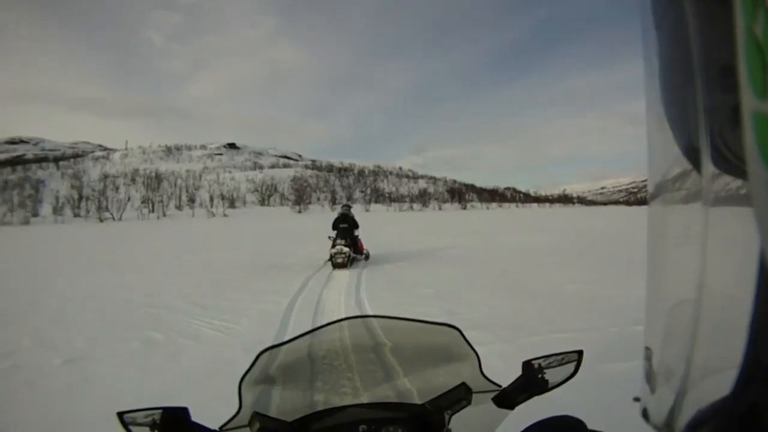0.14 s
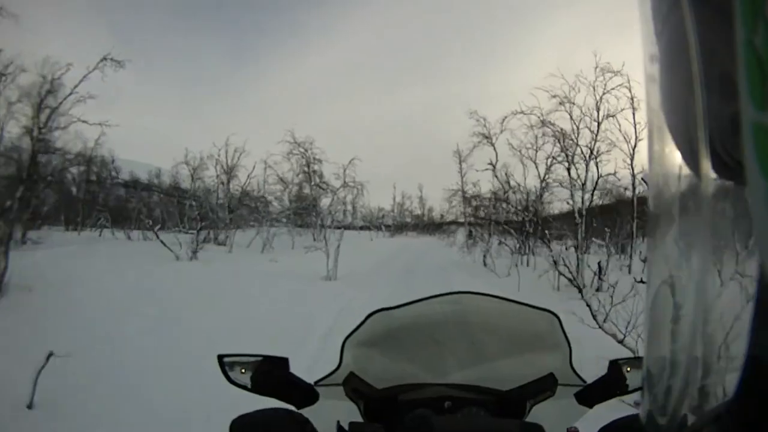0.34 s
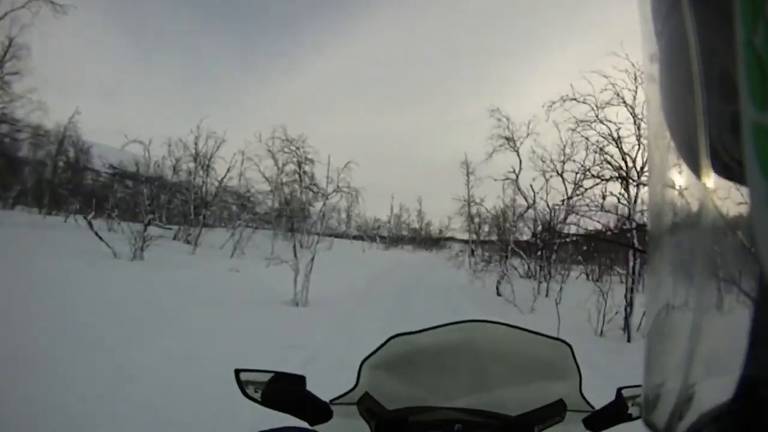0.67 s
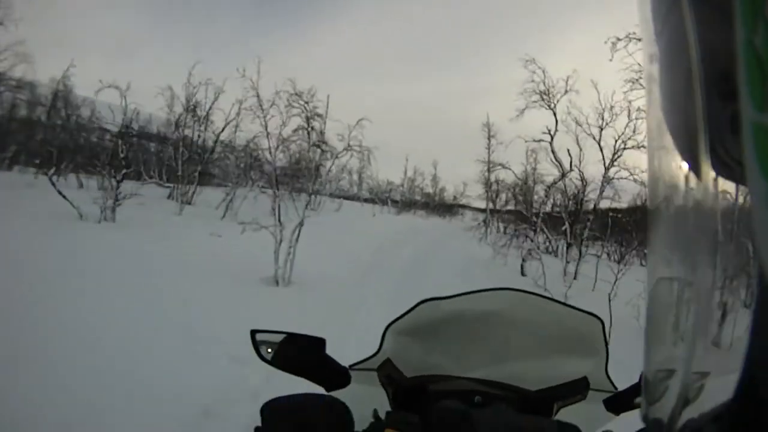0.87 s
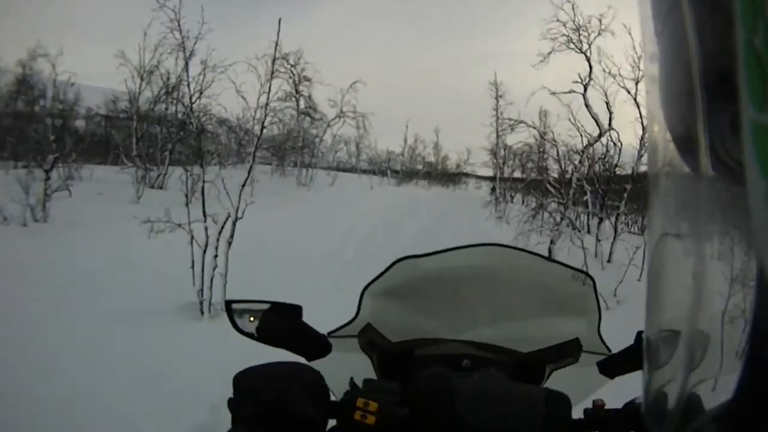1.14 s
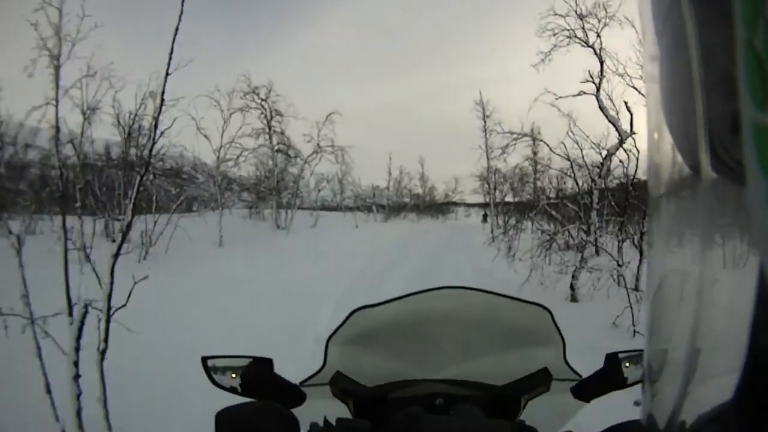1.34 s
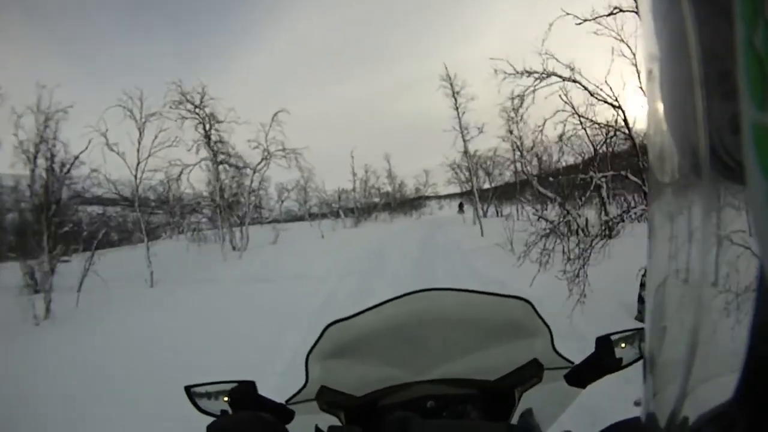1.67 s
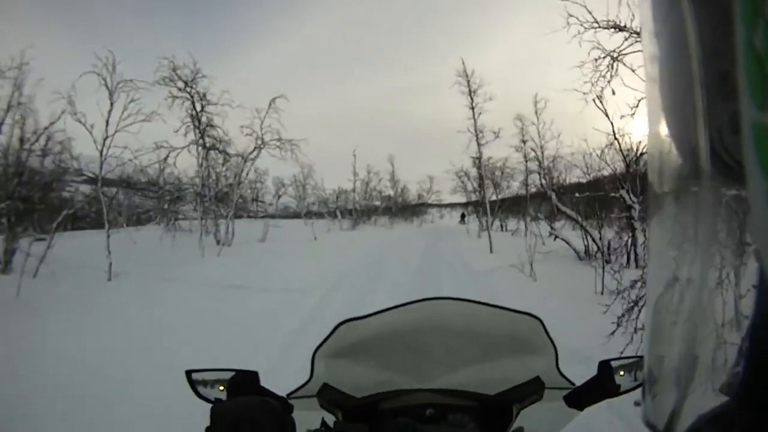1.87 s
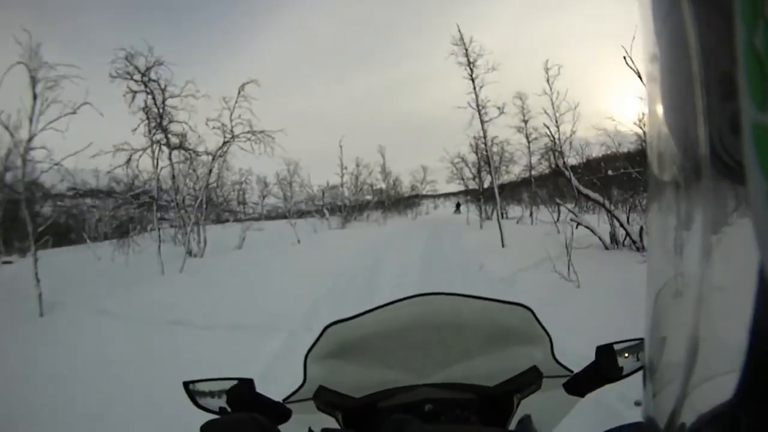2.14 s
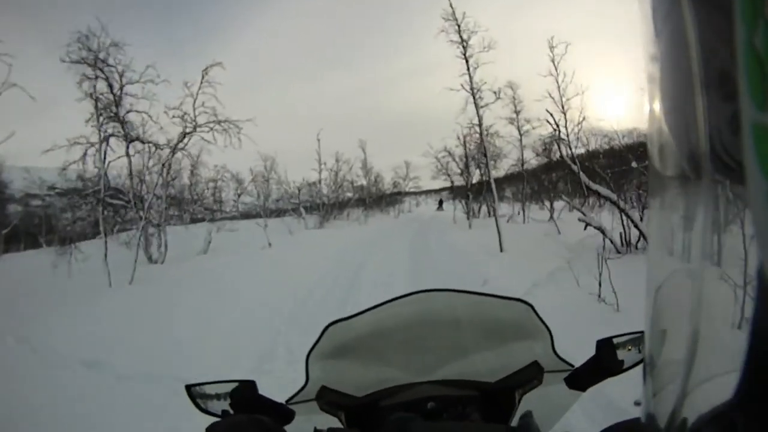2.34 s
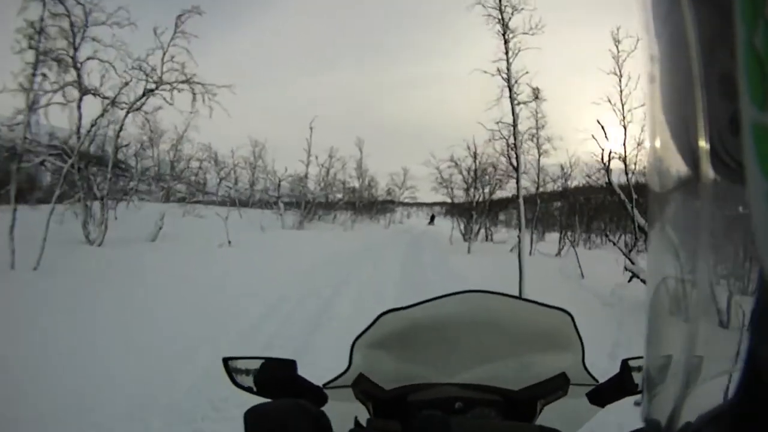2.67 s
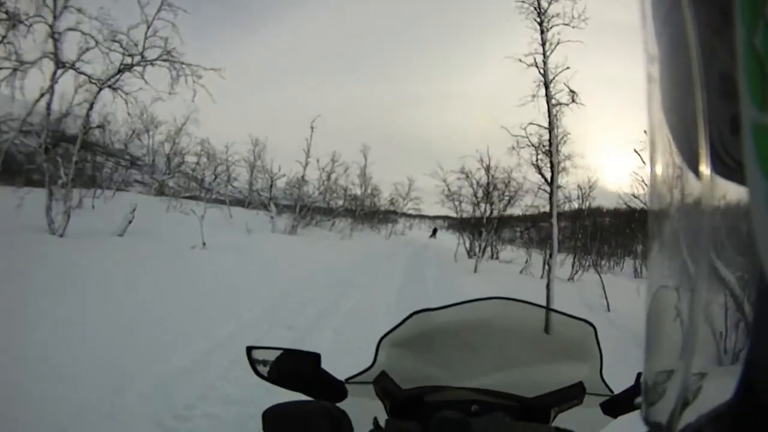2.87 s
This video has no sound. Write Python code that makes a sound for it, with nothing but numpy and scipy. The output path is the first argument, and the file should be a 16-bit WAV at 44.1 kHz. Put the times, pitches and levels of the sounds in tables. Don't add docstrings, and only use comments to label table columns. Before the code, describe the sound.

Wind buffets a microphone on a moving snowmobile, thudding, rasping and popping over a faint engine drone

```python
import sys
import numpy as np
from scipy import signal
from scipy.fft import rfft, irfft
from scipy.io import wavfile
from scipy.ndimage import uniform_filter1d

SR = 44100
rng = np.random.default_rng(int(sys.argv[2]) if len(sys.argv) > 2 else 0)


def bounce(signal):
    frames = np.transpose(np.atleast_2d(signal))
    limited = np.clip(frames, -1, 1)
    pcm = np.round(limited * 32767).astype(np.int16)
    wavfile.write(sys.argv[1], SR, pcm)


def undo_db(level):
    steps = np.asarray(level, float) / 20
    return 10 ** steps


N = 132300
CUT_S = 0.21


def unit(x):
    return x / np.sqrt(np.mean(x ** 2))


def colour(x, points):
    hz = np.fft.rfftfreq(N, 1 / SR) + 1
    p = np.array(points, float)
    curve_db = np.interp(np.log(hz), np.log(p[:, 0]), p[:, 1])
    return irfft(rfft(x) * undo_db(curve_db), N)


def noise(points):
    return unit(colour(rng.standard_normal(N), points))


def walk(rate_hz):
    steps = rng.standard_normal(4000)
    hold = SR / rate_hz
    path = np.interp(np.arange(N) / hold, np.arange(4000), steps)
    return unit(uniform_filter1d(path, int(hold / 2) + 1))


# (frequency [Hz], width [Hz], level [dB])
EXHAUST = [(218, 204, 15), (408, 40, -14.5), (615, 31, -5), (1007, 530, 7.5)]


def engine():
    FIRING_HZ, FIRING_WANDER, ENGINE_DB = 104.5, 0.013, -47
    turns = np.cumsum(FIRING_HZ * (1 + FIRING_WANDER * walk(3)) / SR)
    at = np.flatnonzero(np.diff(np.floor(turns)))
    draw = rng.standard_normal((600, 2))[:len(at)]
    late = (45 * draw[:, 0]).astype(int)
    fire = np.zeros(N)
    fire[np.clip(at + late, 0, N - 1)] = undo_db(4 * draw[:, 1])
    fire = fire + 0.011 * rng.standard_normal(N) * np.exp(-(turns % 1) / 0.083)
    ring = np.zeros(N)
    for hz, width, db in EXHAUST:
        ring += undo_db(db) * signal.lfilter(*signal.iirpeak(hz, hz / width, SR), fire) / np.sqrt(width)
    return undo_db(ENGINE_DB) * unit(colour(ring, [(1500, -19), (4000, -38.5)]))


# (frequency [Hz], level [dB])
CALM = [(18, -38), (30, -11.5), (116, 0), (206, -11), (1790, -32), (2270, -40.5), (9030, -46.5),
        (15000, -57)]


def calm_air():
    CALM_DB = -47.5
    return undo_db(CALM_DB) * noise(list(CALM) + [(15300, -110)]) * undo_db(walk(32))


# (frequency [Hz], level [dB])
THUD = [(20, -2), (60, -6.5), (130, 1.5), (250, -0.5), (500, -9.5), (1000, -15.5), (4000, -62)]


def thud(low, t):
    THUD_TRIM_DB, THUD_LEAN, THUD_LAG_MS = -4, 0.1, 2.5
    calm_push = noise([(60, -1.0), (115, 3.5), (300, -11), (700, -47.0), (4000, -95)])
    push = noise(THUD)
    push = push / np.sqrt(uniform_filter1d(push ** 2, size=500) + 0.36)
    leaning = push + THUD_LEAN * (push ** 2 - 1)
    rumble = np.where(t > CUT_S, leaning, calm_push)
    swell = np.roll(low, int(THUD_LAG_MS * SR / 1000))
    vent = signal.butter(1, 40, "high", fs=SR, output="sos")
    return signal.sosfilt(vent, undo_db(THUD_TRIM_DB) * swell * rumble)


# (frequency [Hz], level [dB])
RASP = [(500, -0.5), (1500, 2.5), (4000, -14.5), (7000, -25), (11000, -37.5), (16000, -80)]
# (time [s], level [dB])
CRACKLES = [(0.2252, -45), (0.2547, -46.5), (0.2987, -53), (0.3073, -45.5), (0.3415, -51), (0.3573, -53.9),
            (0.4112, -54), (0.448, -54), (0.5172, -56), (0.5343, -54), (0.5786, -51), (0.5879, -50),
            (0.614, -57), (0.6174, -54), (0.6766, -57.3), (0.699, -53.1), (0.743, -54.5), (0.7887, -56),
            (0.8353, -62), (1.0116, -51.5), (1.1368, -56.8), (1.1497, -61), (1.2457, -51), (1.2754, -61),
            (1.3095, -53), (1.3633, -64), (1.4301, -51), (1.5066, -51), (1.5139, -61), (1.5305, -54),
            (1.604, -58.7), (1.6852, -57), (1.6992, -66), (1.8188, -49.5), (1.9964, -62), (2.0032, -52.5),
            (2.077, -56), (2.1434, -59), (2.151, -68), (2.2563, -52), (2.2594, -60), (2.271, -59.2),
            (2.3275, -52), (2.3693, -56), (2.3777, -57), (2.441, -62), (2.552, -56), (2.5596, -62),
            (2.5897, -58.2), (2.61, -59.4), (2.689, -61.7), (2.725, -52), (2.738, -61), (2.859, -59)]


def rasp(high, t):
    RASP_TRIM_DB, RIPPLE_HZ, RIPPLE_DB = 0, 261, 2.5
    CRACKLE_MS, CRACKLE_TRIM_DB = 2.98, 7
    crackle = np.zeros(N)
    for s, db in CRACKLES:
        crackle += undo_db(db + CRACKLE_TRIM_DB) * np.exp(-(2000 * (t - s) / CRACKLE_MS) ** 2)
    grit = noise(RASP)
    grit = grit / np.sqrt(uniform_filter1d(grit ** 2, size=130) + 0.21)
    ripple = undo_db(RIPPLE_DB * walk(RIPPLE_HZ))
    return (undo_db(RASP_TRIM_DB) * high * ripple + crackle) * grit


# (time [s], thud level [dB])
CALM_EDDIES = [
    (0.038, -43.5),
    (0.06, -37),
    (0.123, -51),
    (0.138, -38),
    (0.202, -42),
]
# (time [s], length [ms], thud level [dB], rasp level [dB])
EDDIES = [(0.253, 5, -20.5, -49), (0.299, 8.9, -30, -45), (0.343, 19, -20.5, -44), (0.413, 7.5, -25, -56),
          (0.449, 5.7, -46, -49.5), (0.517, 12, -29, -57), (0.534, 4.9, -30, -48), (0.562, 3.8, -27, -44),
          (0.582, 8.4, -23.5, -41.5), (0.615, 11, -24.5, -54), (0.676, 20, -30.5, -55.5),
          (0.698, 3.9, -34, -46), (0.742, 21, -37, -58), (0.769, 27, -34.5, -68), (0.789, 5.9, -35, -47),
          (0.834, 20.5, -35.5, -50.5), (0.906, 8.1, -48, -66), (0.932, 16, -31.5, -54),
          (1.012, 47, -33, -56), (1.045, 9.4, -27.5, -49.5), (1.079, 8.3, -32, -57),
          (1.11, 4.5, -31.5, -49), (1.15, 17, -34.5, -43), (1.181, 14, -33, -49.5), (1.247, 28.5, -33, -53),
          (1.275, 11.6, -37, -52.5), (1.309, 13.6, -28, -45), (1.361, 11, -43.0, -49.5),
          (1.393, 19.5, -33.5, -54)]
# (time [s], length [ms], thud level [dB], rasp level [dB])
LATER_EDDIES = [(1.432, 27, -34.5, -56), (1.529, 27, -35, -49), (1.603, 18, -32.5, -48.5),
                (1.648, 14, -36, -60), (1.697, 24, -36.5, -54.5), (1.821, 21.5, -47, -44.5),
                (1.922, 9.9, -32, -54), (1.997, 9.2, -50, -43.5), (2.039, 18, -35, -57),
                (2.077, 17.6, -33, -46), (2.151, 22, -37.5, -48.5), (2.218, 8.4, -37.5, -54.5),
                (2.263, 25, -31, -50.5), (2.352, 6.6, -30.5, -62.5), (2.375, 23, -37.5, -51),
                (2.443, 14.6, -35, -46), (2.489, 13, -34, -56), (2.559, 15.5, -34, -49),
                (2.595, 14.4, -37, -48.5), (2.65, 5.5, -29.5, -53), (2.688, 11.4, -34, -56),
                (2.738, 12, -31.5, -61), (2.777, 14, -33, -57), (2.814, 11, -37, -76),
                (2.858, 8.5, -42, -54), (2.9, 7.8, -34.5, -55), (2.954, 4.2, -30, -76)]
# (time [s], length [ms], rasp level [dB])
RASPS = [
    (1.09, 15, -50),
    (1.212, 46, -52),
    (1.787, 43, -55.5),
]


def eddies(t, gain):
    SHARPNESS, RISE_SHARE, SPRAY_DB = 1.08, 0.71, -64.5
    low = np.zeros(N)
    high = undo_db(SPRAY_DB + 5.6 * walk(81)) * gain
    rows = [(s, 14, db, -75) for s, db in CALM_EDDIES]
    rows += [(s, ms, db + 12.0, db) for s, ms, db in RASPS]
    for s, ms, thud_db, rasp_db in rows + list(EDDIES) + list(LATER_EDDIES):
        d = (t - s) / (ms / 1000)
        side_length = np.where(d < 0, RISE_SHARE, 1 - RISE_SHARE)
        shape = np.exp(-SHARPNESS * (d / side_length) ** 2)
        low = low + undo_db(thud_db) * shape ** 0.5
        high = high + undo_db(rasp_db) * shape
    return thud(low, t) + rasp(high, t)


# (frequency [Hz], level [dB])
RUSH = [(18, -36), (30, 0), (172, 2.5), (534, -3.5), (2140, -27.5), (9040, -52), (14000, -52)]


def rush(gain):
    RUSH_DB, FLUTTER_HZ, FLUTTER_DB = -37, 68.87, 4.5
    SMALL_POPS_DB, SMALL_POP_SPREAD_DB, SMALL_POP_MS = -35.5, 4.5, 0.6
    flutter = FLUTTER_DB * np.minimum(walk(FLUTTER_HZ), 1)
    air = noise(list(RUSH) + [(14900, -56), (15300, -100)])
    low = signal.sosfiltfilt(signal.butter(1, 2500, fs=SR, output="sos"), air)
    even = low / np.sqrt(uniform_filter1d(low ** 2, size=900) + 0.24)
    stream = undo_db(RUSH_DB) * (even * undo_db(flutter) + (air - low))
    draw = rng.random((420, 4))
    s = 0.22 + 2.76 * draw[:, 0]
    db = SMALL_POPS_DB - SMALL_POP_SPREAD_DB * np.log(draw[:, 1] + 0.11) + flutter[(s * SR).astype(int)]
    ms = SMALL_POP_MS * (0.6 + 1.5 * draw[:, 2])
    hail = diaphragm(np.c_[s, db, ms, draw[:, 3] - 0.3])
    return gain * (stream + hail)


def diaphragm(rows):
    CAPSULE_HZ, POP_EDGE = 78.5, 1.42
    out = np.zeros(N + 800)
    u = np.arange(-400, 400) / SR
    for s, db, ms, sign in rows:
        i = int(s * SR)
        d = u - (s * SR - i) / SR
        out[i:i + 800] += np.sign(sign) * undo_db(db) * np.exp(-np.abs(2 * d / (ms / 1000)) ** POP_EDGE)
    vent = signal.butter(2, CAPSULE_HZ, "high", fs=SR, output="sos")
    return signal.sosfilt(vent, out[400:-400])


# (time [s], peak level [dB], width [ms], push +1 or pull -1)
CHOKE_POPS = [
    (0.2165, -18, 1.4, -1),
    (.2200, -11, 1, 1),
    (0.221, -12, 2.2, -1),
    (0.2998, -17.5, 1.1, 1),
    (0.3077, -14, 0.49, 1),
    (0.3405, -22, 0.44, -1),
    (0.4493, -29, 0.59, 1),
]
# (time [s], peak level [dB], width [ms], push +1 or pull -1)
POPS = [(0.2193, -13, 0.49, 1), (0.2278, -12, 1.14, 1), (0.3674, -16.5, 0.89, 1), (0.5874, -15.5, 0.92, 1),
        (0.7691, -17, 1.08, 1), (.9046, -28, 0.83, 1), (0.9063, -19.5, 0.96, 1), (1.0125, -26, 0.67, 1),
        (1.2752, -23.5, 0.39, 1), (1.3089, -32.5, 0.24, 1), (1.4357, -22, 1.25, 1), (1.5155, -26, 0.69, 1),
        (1.5307, -20, 1.3, 1), (1.8251, -22.5, 1.1, -1), (2.2667, -25.5, 0.74, -1), (2.3771, -21, 1.07, -1),
        (2.4873, -26, 0.97, 1), (2.4919, -27.5, 2.4, -1), (2.5953, -22, 1.2, -1)]
# (time [s], peak level [dB], width [ms], push +1 or pull -1)
MORE_POPS = [(0.579, -23.0, 0.91, 1), (0.613, -22.5, 1.3, 1), (0.698, -19, 1.9, 1), (0.8348, -21.5, 3.3, 1),
             (1.2488, -25.8, 0.61, 1), (1.5093, -26.5, 0.46, 1), (1.6493, -28.5, 0.57, 1),
             (1.699, -26.5, 1.05, 1), (1.8174, -32, 1, -1), (1.8215, -21.5, 1.5, -1),
             (1.8363, -29.8, 1.01, 1), (1.9222, -28.7, 1.1, 1), (1.9949, -29.5, 0.13, -1),
             (1.9982, -29, 0.64, 1), (2.0027, -26, 1.1, 1), (2.0761, -27.5, 0.97, -1),
             (2.0814, -27, 1.6, -1), (2.1307, -27.7, 0.63, 1), (2.2568, -26.9, 0.93, 1),
             (2.2624, -29, 0.78, 1), (2.2707, -25.5, 0.74, 1), (2.3513, -30, 0.52, 1),
             (2.5592, -26.4, 0.71, 1), (2.6508, -26.5, 0.57, 1), (2.6891, -27.4, 0.49, 1),
             (2.7391, -28, 0.73, 1), (2.8139, -29.5, 1.1, 1), (2.8581, -28, 1.5, 1), (2.9024, -31, 0.47, 1),
             (2.9544, -33, 0.81, 1)]


def pops():
    return diaphragm(list(POPS) + list(CHOKE_POPS) + list(MORE_POPS))


# (time [s], level [dB])
GAIN = [
    (.21, 0.5),
    (.37, -1.5),
    (.75, -8.5),
    (1.0, -11.5),
    (1.5, -11.5),
    (1.85, -9),
    (3.0, -10.5),
]


def sinking_gain(t):
    return undo_db(np.interp(t, *np.array(GAIN).T))


# (start [s], end [s])
GAPS = [
    (.2049, .2161),
    (.3006, .3058),
    (.3378, .3404),
    (.4525, .4588),
]


def unchoked(t):
    return uniform_filter1d(1. - sum((t > a) & (t < b) for a, b in GAPS), size=25)


# (frequency [Hz], level [dB])
TOP = [(12700, 0), (13000, -16), (14000, -20), (15000, -50)]
# start [s], end [s]
TOP_CLOSES_S = (.23, .75)
# start [s], end [s], above [Hz]
TOP_DROPOUT = (2.628, 2.668, 10300)


def sinking_treble(mid, t):
    begun = t > TOP_CLOSES_S[0]
    patches = walk(30) < np.interp(t, TOP_CLOSES_S, [-1, 4])
    closed = uniform_filter1d(1. * patches * begun, size=400)
    half_open = np.where(begun, colour(mid, [(13000, 0), (14700, -6), (15100, -50)]), mid)
    mid = colour(mid, TOP) * closed + half_open * (1 - closed)
    start, end, hz = TOP_DROPOUT
    lost = uniform_filter1d(1. * ((t > start) & (t < end)), size=400)
    return mid - lost * colour(mid, [(hz - 400, -60), (hz, 0)])


# (frequency [Hz], side level under mid [dB])
PORT_GAP = [(60, -43), (300, -35), (2000, -29), (12000, -15)]


def ports(mid, open_):
    scramble = np.exp(2j * np.pi * rng.random(513))
    smear = signal.fftconvolve(mid, irfft(scramble), "same")
    side = colour(smear, PORT_GAP)
    wandering = colour(side, [(1500, -5.5), (5000, -18)]) * undo_db(10.5 * walk(7.28))
    side = (side + wandering) * open_
    return np.array([mid + side, mid - side])


def scene():
    t = np.arange(N) / SR
    gain = sinking_gain(t)
    after = t > CUT_S
    drone = np.where(after, gain, undo_db(-25)) * engine()
    steady = drone + rush(gain * after) + calm_air() * ~after
    open_ = unchoked(t)
    mid = (steady + eddies(t, gain * after)) * open_ + pops()
    mid = mid * np.where((t > GAPS[0][0]) & (t < GAPS[0][1]), 0, 1)
    return ports(sinking_treble(mid, t), open_)


def roll_off(x):
    return signal.sosfilt(signal.butter(12, 16330, fs=SR, output="sos"), x)


def record(dry):
    return roll_off(dry)


dry = scene()
out = record(dry)
bounce(out)
```